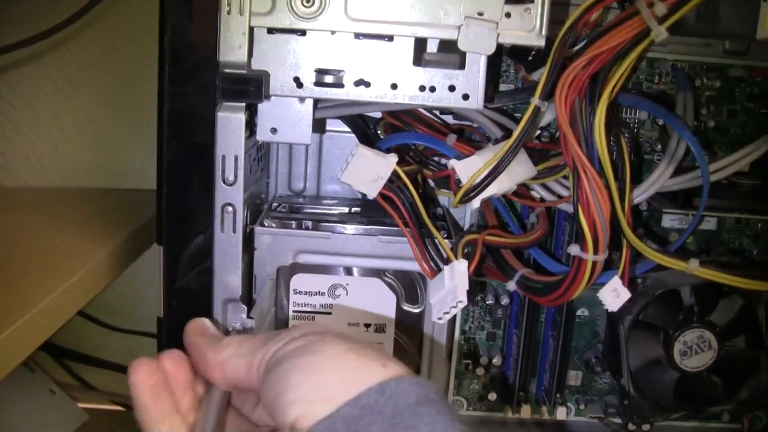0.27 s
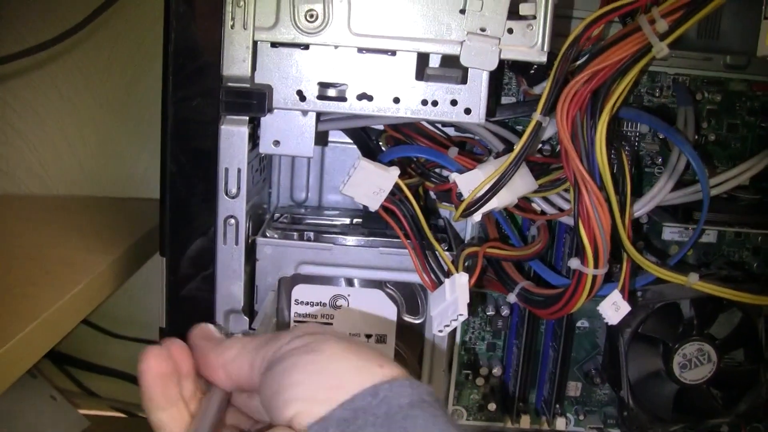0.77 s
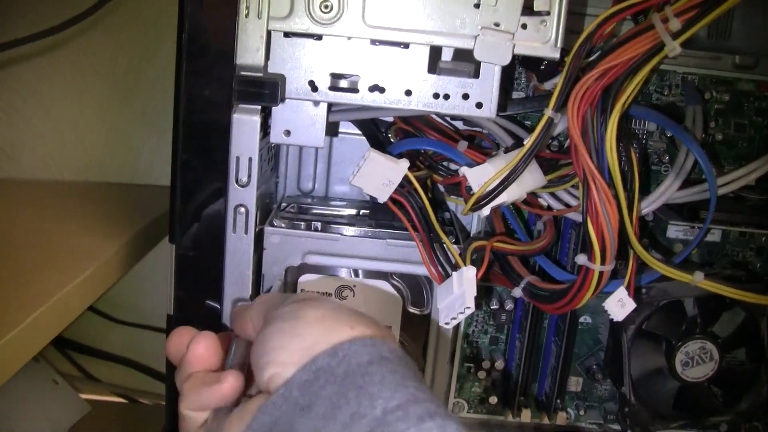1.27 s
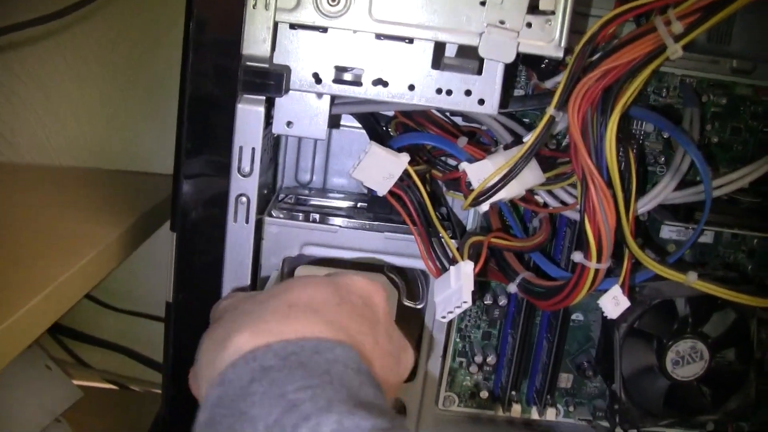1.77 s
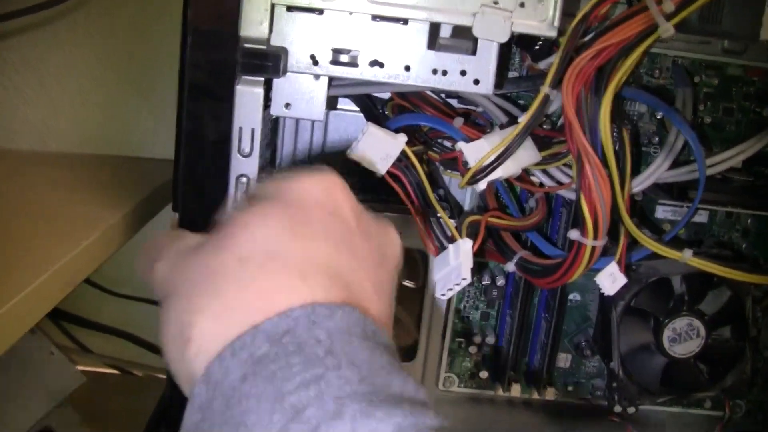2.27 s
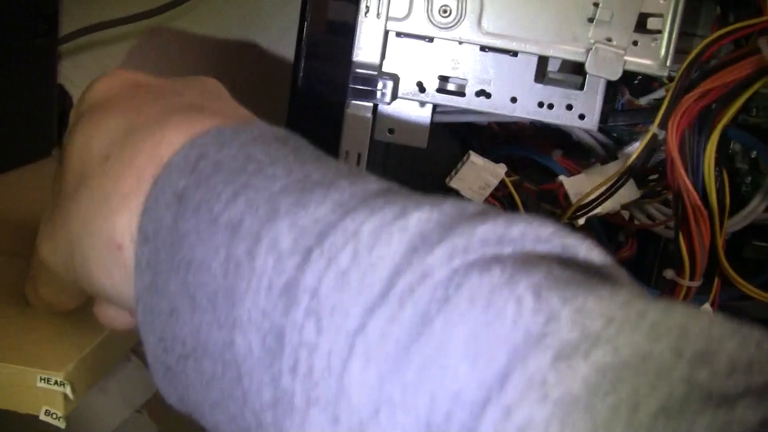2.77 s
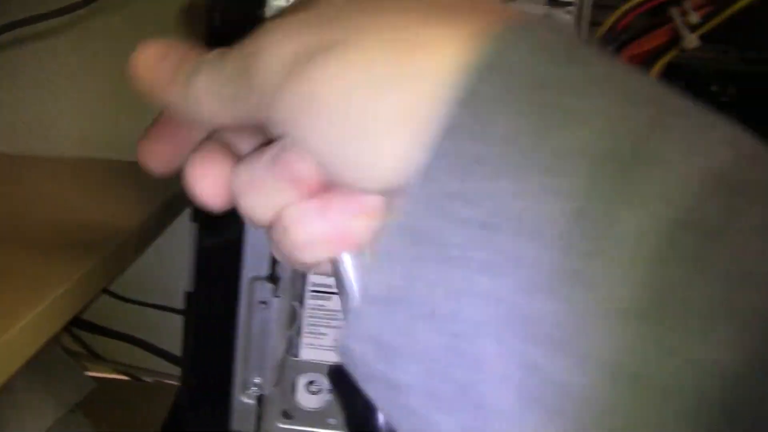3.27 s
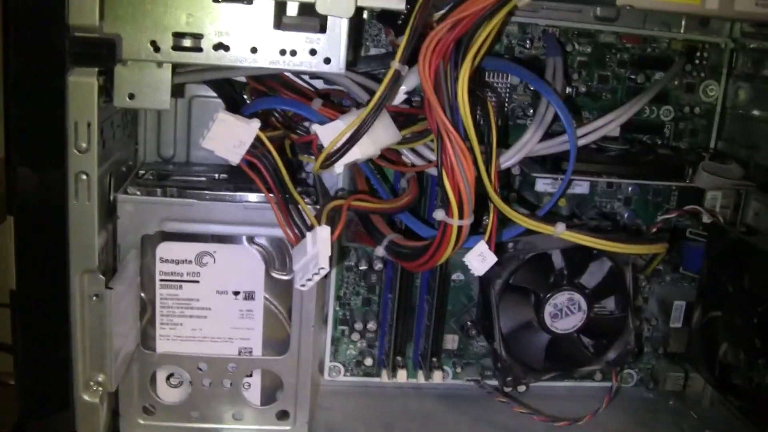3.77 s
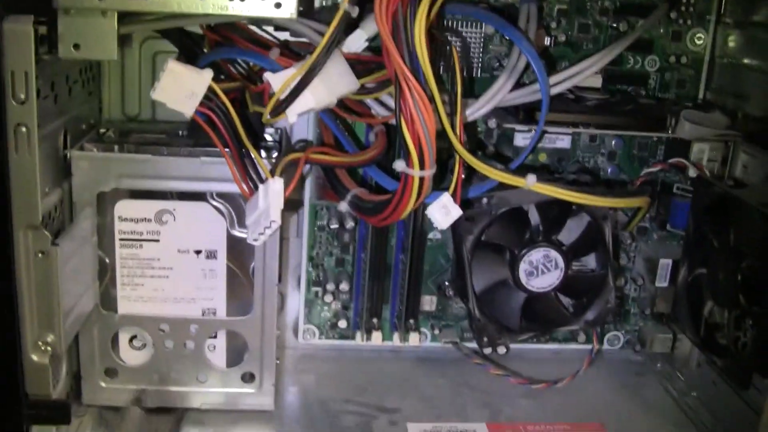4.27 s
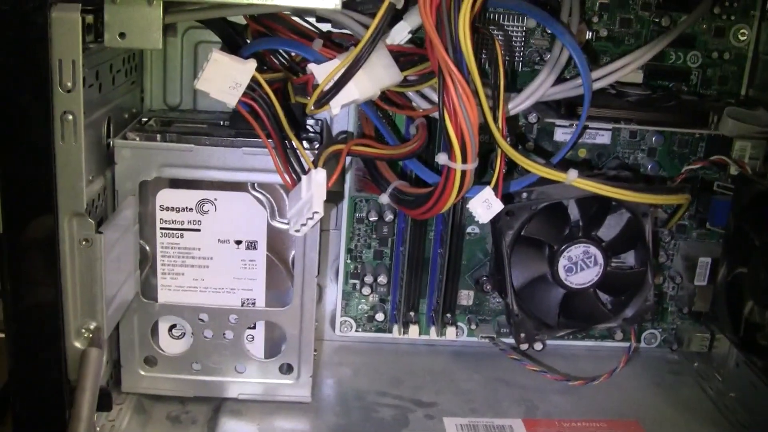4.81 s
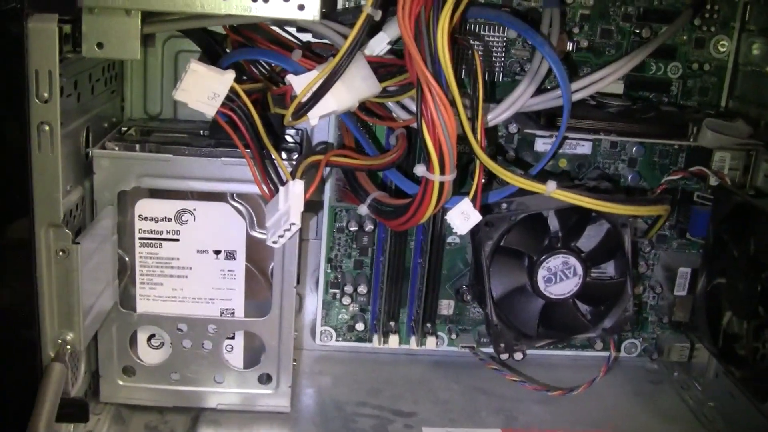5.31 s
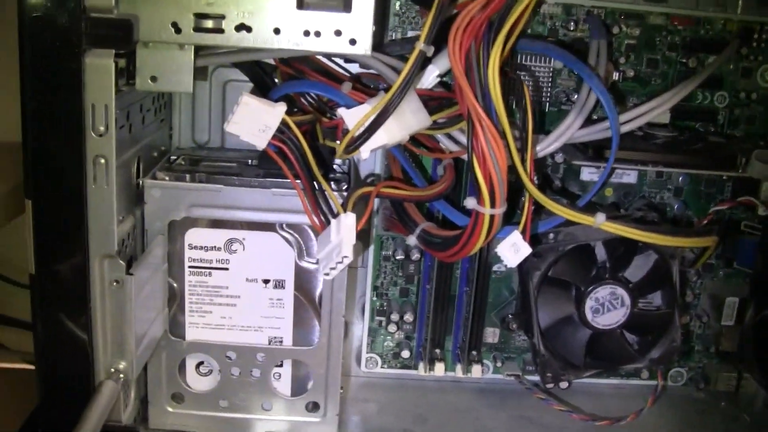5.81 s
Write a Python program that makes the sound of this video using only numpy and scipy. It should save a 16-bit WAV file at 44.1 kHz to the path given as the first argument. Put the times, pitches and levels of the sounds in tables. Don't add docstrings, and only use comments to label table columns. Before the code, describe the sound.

Close up in a small quiet room, a screwdriver makes faint ticks and scrapes on thin steel, with hollow knocks and one harder clank. A freed screw patters lightly on a wooden desk. A plastic mount then clicks and cracks loudly as it is pushed over, with a brief cloth hiss. After a short lull, the bit knocks sharply on steel again, fading to small ticks.

```python
import sys
import numpy as np
from scipy import signal
from scipy.io import wavfile
from scipy.ndimage import uniform_filter1d

SR = 44100
rng = np.random.default_rng(int(sys.argv[2]) if len(sys.argv) > 2 else 0)


def master(y):
    cut = np.clip(np.atleast_2d(y).T, -1, 1)
    pcm = np.round(cut * 32767)
    wavfile.write(sys.argv[1], SR, pcm.astype(np.int16))


def to_linear_factor(level_db):
    exponent = np.asarray(level_db, float) / 20
    return 10 ** exponent


N = 266805

# (frequency [Hz], density [dB per Hz])
ROOM_SPECTRUM = [(15, -51), (40, -30), (64, -36.5), (100, -7), (170, -7), (250, -6.5), (530, -5),
                 (890, -10.5), (2000, -19), (5400, -26.5), (10000, -29.5), (15500, -29.5), (16500, -40)]
# (frequency [Hz], likeness [0-1])
ROOM_LIKENESS = [(30, 0.49), (150, 0.042), (1000, 0.033), (4000, 0.3), (15000, .1)]
# (frequency [Hz], side re middle [dB])
RING_WIDTH = [(100, -22), (1000, -14.5), (4000, -11), (8000, -3.5), (14000, 2)]

# (time [s], level [dB], frequency [Hz], t60 [s])
DESK_BOOMS = [
    (1.35, -52, 97.8, 0.83),
    (1.803, -49, 76, 0.2),
    (2.09, -55, 99, 0.22),
    (3.632, -44, 44, 0.066),
    (4.72, -47, 99, 0.15),
    (5.37, -48, 88, 0.13),
]

# (start [s], end [s], level [dB], from [Hz], to [Hz])
FIBRE_WHISTLES = [
    (3.704, 3.828, -59, 13800, 14300),
    (3.711, 3.817, -52.5, 7800, 8200),
    (3.84, 3.94, -56, 9300, 13400),
    (3.863, 3.93, -58, 12500, 14500),
    (4.1, 4.165, -57, 13500, 14000),
    (4.092, 4.16, -55, 6250, 6800),
    (4.227, 4.324, -67, 14500, 14800),
    (4.242, 4.31, -61, 8100, 8700),
]
# (start [s], end [s], hiss [dB], rumble rel [dB])
MOUNT_SLIDES = [
    (3.633, 3.964, -54, -1),
    (4.078, 4.317, -68, 7),
]
# (time [s], bright [dB], deep rel [dB], middle rel [dB])
MOUNT_CLICKS = [(2.3435, -51, 15.5, 10.5), (2.4619, -33.5, -3.5, 0.5), (2.6213, -32.5, -4.5, -1.5),
                (2.682, -43.5, 1.5, -2), (2.7465, -59.5, 22.5, 17), (3.3063, -39.5, 5, 6),
                (3.4017, -33.5, 6, 5), (3.441, -45.5, 14, 10.5), (3.476, -51.5, 22, 6),
                (3.523, -51, 22.5, 18), (3.5425, -53, 22, 12), (3.6038, -61, 31, 15), (3.611, -66, 22, 20),
                (3.6366, -8.5, -8, 1), (4.0024, -24.5, -47, -1), (4.0215, -37.5, -27, -1),
                (4.0674, -41.5, 16.5, 3), (4.0764, -28, 6.5, 1.5), (4.0897, -34, 8.5, 7),
                (4.1501, -24, 6, -1), (4.1607, -17.5, -1.5, -2), (4.1753, -24, -35, -16),
                (4.1896, -28, 7, 0), (4.1958, -17.5, 2.5, -6.5), (4.245, -47.5, 6, 16.5),
                (4.2627, -47.5, 8.5, 11), (4.3494, -29.5, -9, -7), (4.3774, -51.5, 21.5, 8)]
# (time [s], bright [dB], middle rel [dB])
JOINT_SNAPS = [(3.6314, 2, -6), (3.64, -1, -11), (3.6969, -8.5, -17), (3.705, -19, -9), (3.7142, -23, -11),
               (3.7286, -22.5, -15), (3.7438, -30.5, -0.5), (3.7615, -28.5, -4), (3.778, -28.5, 0),
               (3.787, -25.5, -9), (3.8294, -17.5, -5), (3.8384, -43, 19.5), (3.853, -34, 3),
               (3.864, -40.5, 14), (3.898, -40.5, 12.5), (3.905, -38, 7), (3.911, -25.5, 4.5),
               (3.9217, -26, -1), (4.196, -10.5, -14)]
# (time [s], level [dB], frequency [Hz])
LOOSE_PINGS = [(3.632, -11.5, 1650), (3.633, -6, 695), (3.6395, -14, 1780), (3.912, -28.5, 2170),
               (4.003, -37, 2250), (4.0764, -29.5, 3440), (4.147, -24.5, 3100), (4.153, -26, 3060),
               (4.161, -20, 2970), (4.167, -29, 3040), (4.176, -25, 3050), (4.182, -32, 2940),
               (4.1955, -16.5, 3130), (4.352, -26, 5790)]
MOUNT_PARTS_HZ = [480, 1500, 4300, 8500]
LIGHT_PARTS_HZ = [480, 1700, 3600, 6500]
# (frequency [Hz], t60 [s])
MOUNT_T60 = [(250, 0.0075), (550, 0.12), (1500, 0.08), (4000, 0.028), (14000, 0.078)]
# (frequency [Hz], level [dB])
MOUNT_MODES = [(400, 8.8), (470, 18), (550, 20), (660, 15), (1380, 7.8), (2200, 1), (3000, 4.1)]

# (time [s], bright [dB], top rel [dB])
SCREW_BOUNCES = [(2.8458, -23, -5), (2.851, -30.5, -9), (2.8581, -19, -4.5), (2.866, -33, -15),
                 (2.8813, -26, -17), (2.898, -26.5, -13), (2.909, -29, -19), (2.919, -34, -25),
                 (2.925, -34.5, -32), (2.974, -36, -26), (2.9865, -29, -12), (3.0026, -36.5, -10),
                 (3.0188, -44, -21)]
DESK_PARTS_HZ = [600, 2100, 3600, 8000]
# (frequency [Hz], t60 [s])
DESK_T60 = [(300, 0.35), (2100, 0.17), (4500, 0.047), (7000, 0.082), (8200, 0.069), (9500, 0.0064)]
# (frequency [Hz], level [dB])
DESK_MODES = [(1220, 6.2), (2120, 2.5), (2180, 5.5), (2370, 4.9), (3260, 5.4), (4210, 5.6), (4500, 4.6),
              (5070, 3.4), (5550, 5.5), (6870, 7.1), (7270, 12), (7900, 9.2), (8090, 21), (8300, 16)]

# (time [s], level [dB], frequency [Hz], t60 [s])
EDGE_CHIPS = [(0.2012, -31.5, 3050, 0.006), (0.894, -32, 3180, 0.0067), (1.3963, -27.5, 5950, 0.0054),
              (1.8035, -10, 5560, 0.021), (1.8038, -11, 6760, 0.016), (2.0928, -15, 4230, 0.0073),
              (2.094, -25, 2820, .04), (2.859, -25, 3100, .012), (3.6368, -8.5, 6200, .006),
              (3.637, -23, 11500, 0.0042), (3.6402, -5, 5600, 0.0066), (3.6403, -18, 10800, 0.0036),
              (3.6965, -5, 5600, 0.0029), (4.0058, -27, 5340, 0.0052), (4.078, -36, 6500, 0.0051),
              (4.191, -42, 6200, 0.018), (4.1962, -22, 9040, 0.006), (4.203, -35, 5800, .02),
              (5.4515, -31, 5100, 0.0053), (5.4975, -20, 4400, 0.0048)]
# (time [s], level [dB], frequency [Hz], t60 [s])
STEEL_SHIVERS = [(1.108, -38, 4480, 0.055), (1.109, -36, 2155, .06), (1.812, -34.5, 5600, 0.18),
                 (1.903, -32.5, 5580, 0.054), (2.0885, -21, 5680, .04), (4.718, -13.5, 4970, .05),
                 (4.783, -24, 4800, .04), (5.039, -19, 4640, 0.065), (5.041, -22.5, 4950, 0.09),
                 (5.12, -17, 4500, 0.044), (5.727, -49.5, 4700, 0.046)]

# (time [s], upper [dB], deep rel [dB], middle rel [dB])
BOX_ANSWERS = [(0.144, -51.5, 3, 5), (0.204, -45.5, 5, 4.5), (0.259, -47, 8, 2), (.296, -40, -1, 3),
               (.45, -30.5, -6, 5.5), (0.562, -63, 4, -1), (.615, -44.5, -1, 12), (.712, -40.5, 8, 2),
               (.742, -29.5, -9, -23), (.848, -38.5, 6.5, 3), (.9, -43.5, -5, 6.5), (1.045, -44, -5, 10.5),
               (1.122, -46, 3, -5), (1.329, -26.5, -4, -5.5), (1.404, -33, -6, -6), (1.47, -35, -5, -11),
               (1.522, -45, 7, -3), (1.724, -45, 5, 10), (1.741, -59, -2, 0), (1.76, -63, -5, -5),
               (1.794, -36, -5, 3), (1.822, -27.5, -1, -5), (1.902, -33, -5, -5), (2.13, -36, -7, -2),
               (4.724, -13, -11, -7.5), (4.82, -25.5, -2, 4.5), (5.122, -18, -20, -3.5),
               (5.18, -23, -3, 0.5), (5.457, -32, -13, -7), (5.503, -37, -8.5, -1), (5.66, -48, 14.5, 8.5),
               (5.77, -56, 16, 6), (5.846, -37.5, -20, 6.5), (6.008, -37.5, -10, -12)]
BOX_PARTS_HZ = [268, 810, 1374, 1910]
# (time [s], bright [dB], middle rel [dB], top rel [dB])
BIT_REBOUNDS = [(.288, -46, 9, -20), (.738, -24.5, -5, -12), (.836, -38, 5, -16), (1.8068, -19, 6, -9.5),
                (2.093, -18.5, -7, -15), (2.109, -24, 2, -1), (4.7269, -18.5, -9, -12),
                (4.8185, -16, -15, -14), (5.026, -36, -10, -16), (5.116, -30, -24, -19),
                (5.1765, -19.5, -19, -12.5), (5.462, -49, 3, -23), (5.515, -52, -5, -20)]

CASE_PARTS_HZ = [250, 1000, 4500, 9500]
# (frequency [Hz], t60 [s])
CASE_T60 = [(120, 0.22), (330, 0.47), (870, 0.43), (2000, 0.2), (3000, 0.14), (6000, 0.098), (14000, 0.017)]
# (frequency [Hz], level [dB])
CASE_MODES = [(205, 12.3), (226, 14), (290, 1.2), (417, 4.7), (538, 9.9), (754, 14.5), (905, 6.1),
              (970, 6.1), (1230, 10), (1432, 8.4), (1657, 5.1), (2140, 1.3), (3460, 0.61), (4815, 1.6),
              (5020, 6.5), (5297, 5), (6900, 12)]
# (time [s], level [dB], frequency [Hz], t60 [s])
PANEL_HUMS = [(1.805, -5.5, 770, 0.044), (1.808, -18.5, 202, 0.18), (1.809, -14, 2510, 0.027),
              (1.81, -25.5, 287.5, 0.31), (1.811, -20.5, 894, 0.15), (1.812, -21.5, 435, 0.14),
              (1.813, -30, 2130, 0.08), (2.088, -13.5, 810, 0.048), (2.094, -17, 198, 0.11),
              (2.1, -30.5, 521, 0.22), (2.095, -22.5, 892, 0.12), (2.092, -26, 1490, 0.11),
              (2.10, -29, 294, 0.39), (2.105, -25, 2240, 0.084), (2.11, -38, 3910, 0.15),
              (2.13, -31, 2330, 0.065), (2.15, -36, 2290, .05), (2.176, -44, 2240, 0.05),
              (4.722, -19, 1447, 0.12), (4.723, -27, 1270, 0.31)]
# (time [s], level [dB], frequency [Hz], t60 [s])
LID_HUMS = [
    (4.82, -39, 224.7, 0.9),
    (4.98, -46, 224.7, .5),
    (5.13, -38, 225.4, 0.5),
    (5.67, -37, 224, .45),
]
# (time [s], bright [dB], deep rel [dB], middle rel [dB])
BIT_RUBS = [(.17, -51.5, 9, 2), (.64, -58, -2, -6), (1.09, -45, 2, -9), (1.699, -52, 17, 3),
            (2.03, -52.5, -10, 14), (4.995, -50.5, 12, 5), (5.018, -40, -8, 9.5), (5.641, -50, 10, -10),
            (5.726, -56, 16, -19), (5.83, -55, 17.5, 17), (6.0, -62, 19, 22.5)]
# (time [s], pressure [dB], brightness [dB])
BIT_DRAGS = [
    [(0.0, -33.5, -47), (0.06, -52.5, -5.5), (0.38, -40.5, -13), (0.54, -47, -24), (0.95, -47.5, -8),
     (1.15, -51, -6.5), (1.83, -48.5, -7), (2.06, -46, -3), (2.3, -55, -7)],
    [(4.77, -59, -16), (4.92, -60, -33), (5.048, -67, -16), (5.158, -37, -44), (5.342, -56, -9),
     (5.478, -48, -39), (5.62, -57, -8), (5.764, -54, -15), (6.05, -58, -28)],
]
# (time [s], bright [dB], deep rel [dB], middle rel [dB], top rel [dB])
EDGE_TICKS = [(0.143, -46, -18, 17, -22), (0.201, -38, -19, 13.5, -30), (0.294, -33, -23, 10.5, -30),
              (0.3573, -49.5, -4, 19, -18), (0.372, -51.5, -6, 25.5, -20), (0.629, -33.5, 2, 12, -31),
              (0.8112, -37, 10.5, 9, -22), (0.8824, -37, -2, 8, -13), (0.8909, -35.5, -1, 12.5, -18),
              (1.8043, -7.5, -21, 0, 3), (2.215, -25, -13, -0.5, -10), (4.7195, -17, -19, -30, -23),
              (5.4031, -44.5, -7, 14.5, -26), (5.45, -26.5, -28, 6.5, -28), (5.479, -33, -21, 3, -23),
              (5.497, -26, -30, 8, -21)]
# (time [s], bright [dB], deep rel [dB], middle rel [dB], top rel [dB])
FIRST_KNOCKS = [(0.3298, -52, -16, 10, -16), (0.445, -24, -6.5, -4.5, -4), (0.609, -46.5, 0, 2, -28),
                (0.7035, -31.5, -5, 2.5, -16), (0.731, -23, -36, -2, -0.5), (0.843, -39.5, 3, 6.5, -10),
                (0.8909, -41, -7, 2, -27), (0.986, -60.5, 26, 25, -18), (1.0167, -48.5, 5, 15.5, -30),
                (1.0475, -48, 14, 7, -13), (1.1061, -34, -1.5, 1, -15), (1.1195, -39.5, -8, -1, -21),
                (1.3228, -23, -8, -1, -9), (1.3959, -32, -3, 7.5, -9), (1.4612, -25.5, -21.5, -1.5, -7.5),
                (1.723, -45.5, 3.5, 14, 1.5), (1.7577, -46.5, -5, 1, -8), (1.7988, -27, 5.5, -2, -19),
                (1.8038, -19.5, 10.5, 3.5, 6.5), (1.9, -32, 7.5, 11.5, -7), (2.0871, -16.5, -4, -3.5, -2.5),
                (2.0992, -21, 1.5, -4, 0), (2.205, -38.5, 6.5, 4.5, -10)]
# (time [s], bright [dB], deep rel [dB], middle rel [dB], top rel [dB])
NEXT_KNOCKS = [(4.7174, -6, -15.5, -14, -7), (4.7815, -15.5, -21, -16, -8.5), (4.815, -13, -7.5, -6, -8),
               (4.9233, -61.5, 27.5, 23.5, -21), (5.0336, -20.5, -30, -22, -25),
               (5.039, -16, -30, -14, -8.5), (5.1182, -9.5, -11, -9, -13), (5.1628, -23.5, -24, -29, -11),
               (5.1785, -28, -6, 7.5, -6), (5.363, -47, 11, 3.5, -22), (5.4012, -50.5, 14.5, 14, -26),
               (5.443, -44, 3, 13, -39), (5.4542, -34.5, -11, 9.5, -28), (5.4969, -28.5, -8.5, 5.5, -42),
               (5.5198, -63, 0, 11, -27), (5.666, -52, 25.5, 6, -16), (5.8553, -69, 18, 22, -18),
               (6.0244, -62, 16, 9, -10)]


def evened(x):
    return x / np.sqrt(np.mean(x ** 2) + 1e-20)


def read(points, hz):
    f, value = np.transpose(points)
    return np.interp(np.log(hz + 1), np.log(f + 1), value)


def follow(rows):
    s, level_db, rel_db = np.transpose(rows)
    t = np.arange(N) / SR
    inside = uniform_filter1d(1. * ((t >= s[0]) & (t <= s[-1])), size=400)
    level = inside * to_linear_factor(np.interp(t, s, level_db))
    return level, to_linear_factor(np.interp(t, s, rel_db))


def band(x, lo_hz, hi_hz):
    sos = signal.butter(2, [lo_hz, min(hi_hz, 20000)], "band", fs=SR, output="sos")
    return signal.sosfilt(sos, x)


def highpass(x, order, cut_hz):
    return signal.sosfilt(signal.butter(order, cut_hz, "high", fs=SR, output="sos"), x)


def body(ring, strong, rise_s, uneven_db, low_hz, top_hz, linger, count, size):
    spread = (np.arange(count) + rng.random(count)) / count
    strong_hz, strong_db = np.transpose(strong)
    hz = np.r_[low_hz + top_hz * spread ** 1.6, strong_hz][:, None]
    db = np.r_[uneven_db * rng.standard_normal(count), strong_db][:, None]
    t = np.arange(size) / SR
    swell = (1 - np.exp(-t / (rise_s * (1000 / hz) ** 0.86 + 1e-5))) ** 2
    t60_s = np.maximum(read(ring, hz), .004)
    t60_s[count:] *= linger
    fade = to_linear_factor(db - 60 * t / t60_s) * swell
    phase = 2 * np.pi * hz * t
    return hz[:, 0], np.vstack([fade * np.sin(phase), fade * np.cos(phase)]).astype(np.float32)


def blow(s, bright_db, deep_db, middle_db, top_db, damp_db):
    return np.column_stack(np.broadcast_arrays(s, bright_db, deep_db, middle_db, top_db, damp_db))


def strike(blows, parts_hz, modes, snap):
    hz, rings = modes
    blows = np.array(blows)
    out = np.zeros((2, N + rings.shape[1]))
    t = np.arange(rings.shape[1]) / SR
    middle, side = rng.standard_normal((len(blows), 2, 2, len(hz))).transpose(1, 0, 2, 3)
    middle[:, 0] += snap
    side *= to_linear_factor(read(RING_WIDTH, hz))
    for k, column in enumerate([2, 3, 0, 4]):
        share = read(list(zip(parts_hz, np.arange(4) == k)), hz) ** 1.077
        awake = np.tile(share > 0, 2)
        weights = np.array([(middle + side) * share, (middle - side) * share], np.float32)
        weights = weights.reshape(2, len(blows), -1)
        part = (weights[..., awake] @ rings[awake]).astype(float)
        part *= to_linear_factor(-np.maximum(blows[:, 5:], 0) * t * SR / 882)
        part /= abs(part.mean(0)).max(1)[:, None]
        part *= to_linear_factor(blows[:, 1] + (column > 0) * blows[:, column])[:, None]
        for i, s in enumerate(blows[:, 0]):
            out[:, round(s * SR):][:, :len(t)] += part[:, i]
    return out[:, :N]


def ping(rows, beat, rise):
    out, t = np.zeros((2, N)), np.arange(12000) / SR
    for s, db, hz, t60_s in rows:
        pair = np.sin(2 * np.pi * hz * t) + 0.32 * np.sin(2 * np.pi * beat * hz * t)
        swell = 1 - np.exp(-t * hz / rise)
        fade = to_linear_factor(db - 60 * t / max(t60_s, .003)) * (1 - (t / t[-1]) ** 4)
        out[:, round(s * SR):][:, :len(t)] += fade * pair * swell
    return out


def room_air():
    frames, hz = N // 256 + 5, np.fft.rfftfreq(1024, 1 / SR)
    a, b, c, d, patches = rng.standard_normal((frames, 513, 5)).T
    patches = uniform_filter1d(patches, size=10, axis=0)
    patches = evened(uniform_filter1d(patches, size=14, axis=1))
    same = np.clip(read(ROOM_LIKENESS, hz), -1, 1)[:, None]
    left = a + 1j * b
    right = same * left + np.sqrt(1 - same ** 2) * (c + 1j * d)
    z = np.array([left, right]) * to_linear_factor(read(ROOM_SPECTRUM, hz)[:, None] + .9 * patches)
    return to_linear_factor(-52.5) * evened(signal.istft(z, nperseg=1024, noverlap=768)[1][:, :N])


def walls(x):
    t = np.arange(SR // 3) / SR
    taps = rng.standard_normal((2, len(t))) * to_linear_factor(-60 * t / 0.45) * (t > .004)
    taps = band(taps, 100, 5400)
    return signal.fftconvolve(x.mean(0)[None], taps / np.linalg.norm(taps[0]), axes=1)[:, :N]


def desk_booms():
    return ping(DESK_BOOMS, beat=1.1, rise=0.86)


def fibres():
    out = np.zeros((2, N))
    for start_s, end_s, db, from_hz, to_hz in FIBRE_WHISTLES:
        u = np.arange(0, 1, 1 / ((end_s - start_s) * SR))
        grit = uniform_filter1d(rng.standard_normal((2, 2, 8000)), size=24)[..., :len(u)]
        turn = np.exp(2j * np.pi * np.cumsum(from_hz + (to_hz - from_hz) * u) / SR)
        whistle = evened(((grit[0] + 1j * grit[1]) * turn).real)
        out[:, round(start_s * SR):][:, :len(u)] += to_linear_factor(db) * whistle * np.sin(np.pi * u)
    return out


def mount_slide():
    rise_s, fall_s, edge_db = .1, .09, -14
    lumps = evened(uniform_filter1d(rng.standard_normal(N), size=200))
    grit = rng.standard_normal((3, N)) * to_linear_factor(1.9 * lumps)
    grit = grit[0] + 0.68 * grit[1:]
    hiss, rumble = evened(band(grit, 6300, 15000)), evened(band(grit, 540, 3800))
    slide = np.zeros((2, N))
    for start_s, end_s, db, rel_db in MOUNT_SLIDES:
        press, dull = follow([(start_s, db + edge_db, rel_db), (start_s + rise_s, db, rel_db),
                              (end_s - fall_s, db, rel_db), (end_s, db + edge_db, rel_db)])
        slide += press * (hiss + dull * rumble)
    return slide


def mount_clicks():
    plastic = body(MOUNT_T60, MOUNT_MODES, rise_s=.0001, uneven_db=4.0, low_hz=279.0, top_hz=16000,
                   linger=0.69, count=320, size=2200)
    hard_db, hard_damp, light_db = -24, 0.64, -17
    click = np.transpose(MOUNT_CLICKS)
    damp_db = 12.0 + hard_damp * np.maximum(click[1] - hard_db, 0)
    clicks = strike(blow(*click, top_db=-18, damp_db=damp_db), MOUNT_PARTS_HZ, plastic, snap=0.69)
    s, db, middle_db = np.transpose(JOINT_SNAPS)
    snaps = blow(s, db, middle_db - 55, middle_db, top_db=-25 + 0.39 * db, damp_db=42)
    hard = strike(snaps[db > light_db], MOUNT_PARTS_HZ, plastic, snap=1.5)
    light = strike(snaps[db <= light_db], LIGHT_PARTS_HZ, plastic, snap=0.84)
    return highpass(band(clicks, 150, 9300) + hard + light, 3, 320)


def mount():
    ping_t60_s = 0.02
    pings = ping([(*row, ping_t60_s) for row in LOOSE_PINGS], beat=0.78, rise=1.8)
    return mount_clicks() + mount_slide() + pings


def screw():
    desk = body(DESK_T60, DESK_MODES, rise_s=0.00089, uneven_db=-5.0, low_hz=273, top_hz=10510,
                linger=1.0, count=300, size=4000)
    s, db, top_db = np.transpose(SCREW_BOUNCES)
    bounces = blow(s, db, deep_db=-16.5, middle_db=-5.5, top_db=top_db, damp_db=13.5)
    shank = ping([(at, hit_db - 6, 2115, .06) for at, hit_db, _ in SCREW_BOUNCES], beat=1.118, rise=1)
    return strike(bounces, DESK_PARTS_HZ, desk, snap=2.6) + shank


def chips():
    return ping(EDGE_CHIPS, beat=1.09, rise=.7)


def shivers():
    waver = uniform_filter1d(rng.standard_normal((3, N)), size=50)
    return ping(STEEL_SHIVERS, beat=1.08, rise=1.6) * evened(waver[0] + 0.33 * waver[1:])


def hollow_box():
    box = body(CASE_T60, CASE_MODES[:11], rise_s=0.0032, uneven_db=0.5, low_hz=150.8, top_hz=1650,
               linger=0.78, count=130, size=5000)
    answers = blow(*np.transpose(BOX_ANSWERS), top_db=-21, damp_db=4.5)
    return strike(answers, BOX_PARTS_HZ, box, snap=0)


def rebounds():
    steel = body(CASE_T60, CASE_MODES, rise_s=.0004, uneven_db=-2.0, low_hz=297.0, top_hz=14960,
                 linger=0.65, count=220, size=3000)
    s, db, middle_db, top_db = np.transpose(BIT_REBOUNDS)
    touches = blow(s, db, middle_db - 9.5, middle_db, top_db, damp_db=15.5)
    return strike(touches, CASE_PARTS_HZ, steel, snap=0.23)


def panels():
    return ping(PANEL_HUMS + LID_HUMS, beat=1.055, rise=2.7)


def rubs():
    soft = body(CASE_T60, CASE_MODES, rise_s=0.016, uneven_db=-1.5, low_hz=126.6, top_hz=15820,
                linger=0.35, count=300, size=6000)
    rows = blow(*np.transpose(BIT_RUBS), top_db=-9.5, damp_db=4.0)
    return strike(rows, CASE_PARTS_HZ, soft, snap=0)


def drag(edge):
    slips_per_s = 160
    lumps = evened(uniform_filter1d(rng.standard_normal(N), size=1200))
    slips = to_linear_factor(3.0 * np.minimum(rng.exponential(1, (4, N)), 4) + 4.0 * lumps)
    slips *= rng.choice([-1, 1], (4, N))
    slips *= rng.random((4, N)) < slips_per_s / SR
    scrape = np.zeros((2, N))
    for spot in slips:
        tap = [(0.0013, -6.0, 0.0045, 6.4, 0.00075, 2.6)]
        ring = strike(tap, CASE_PARTS_HZ, edge, snap=0)[:, :2500]
        scrape += signal.oaconvolve(spot[None], ring, axes=1)[:, :N]
    deep, bright = evened(band(scrape, 76, 1170)), evened(band(scrape, 750, 8900))
    return sum(press * (deep + shine * bright) for press, shine in map(follow, BIT_DRAGS))


def ticks(edge):
    return strike(blow(*np.transpose(EDGE_TICKS), damp_db=34), CASE_PARTS_HZ, edge, snap=1.06)


def knocks():
    steel = body(CASE_T60, CASE_MODES, rise_s=0.0003, uneven_db=4.0, low_hz=119.1, top_hz=16740,
                 linger=0.45, count=400, size=9500)
    grip_from_s, grip_to_s, grip_damp_db, free_damp_db = 1.74, 2.3, 7, 1.5
    next_from_s, gap_lo_hz, gap_hi_hz, gap_depth = 4.6, 1810, 3700, 0.4
    rows = np.transpose(FIRST_KNOCKS + NEXT_KNOCKS)
    gripped = (rows[0] > grip_from_s) & (rows[0] < grip_to_s)
    damp_db = np.where(gripped, grip_damp_db, free_damp_db)
    out = strike(blow(*rows, damp_db), CASE_PARTS_HZ, steel, snap=0.21)
    at_next = np.arange(N) > next_from_s * SR
    return out - gap_depth * band(out, gap_lo_hz, gap_hi_hz) * at_next


def case():
    edge = body(CASE_T60, CASE_MODES, rise_s=.0001, uneven_db=-2.5, low_hz=121.6, top_hz=16350,
                linger=0.1, count=150, size=2500)
    steel = hollow_box() + rebounds() + panels() + rubs() + drag(edge) + ticks(edge) + knocks()
    steel = highpass(steel, 4, 159.7)
    return signal.lfilter(*signal.iirnotch(257, 7.9, fs=SR), steel)


def scene():
    small = fibres() + mount() + screw() + chips()
    steel = case()
    echo = walls(to_linear_factor(-27) * (steel + small))
    return room_air() + echo + desk_booms() + small + shivers() + steel


def roll_off(x):
    return signal.sosfilt(signal.butter(12, 17150, fs=SR, output="sos"), x)


def record(dry):
    x = np.tanh(dry * .92) / .92
    lowpass = signal.firwin(255, 16300, window=("kaiser", 8), fs=SR)
    x = signal.oaconvolve(x, lowpass[None], "same")
    return roll_off(x)


dry = scene()
out = record(dry)
master(out)
```